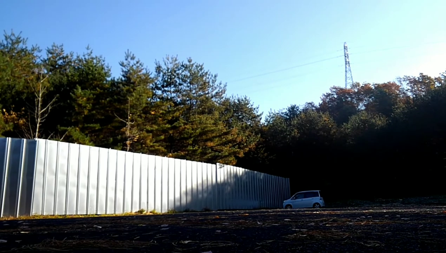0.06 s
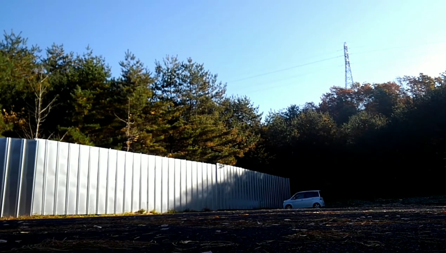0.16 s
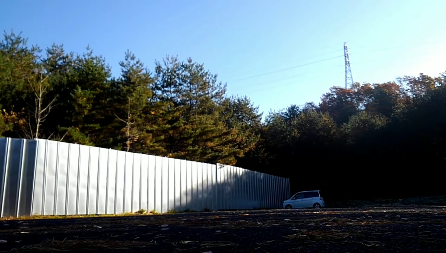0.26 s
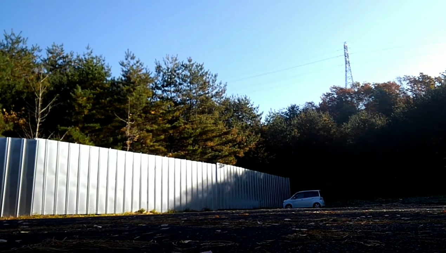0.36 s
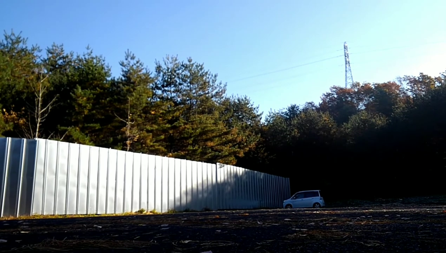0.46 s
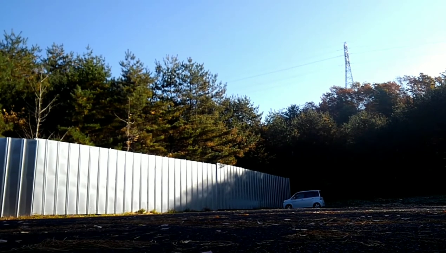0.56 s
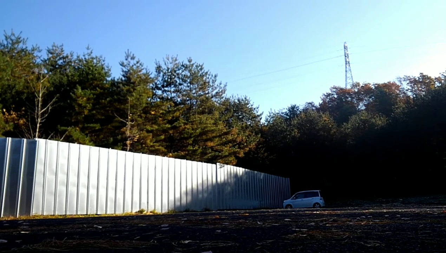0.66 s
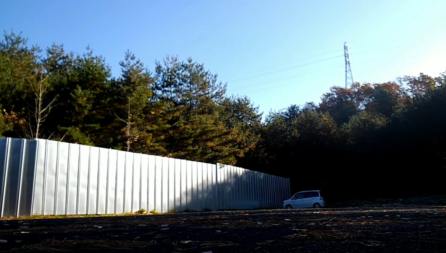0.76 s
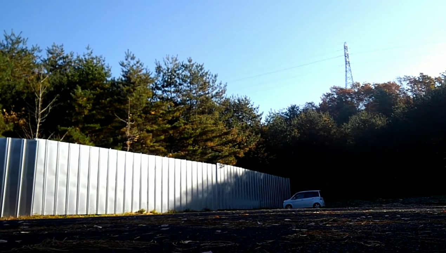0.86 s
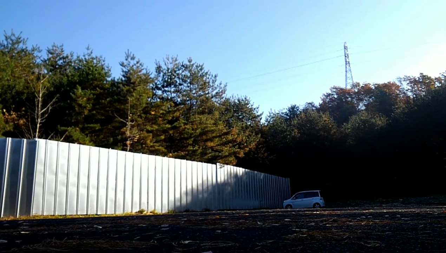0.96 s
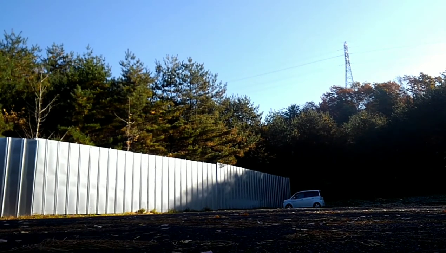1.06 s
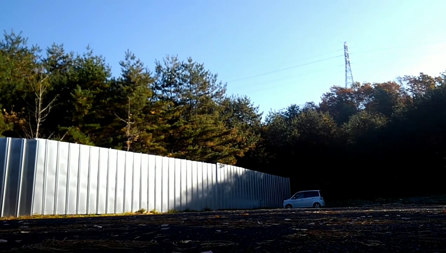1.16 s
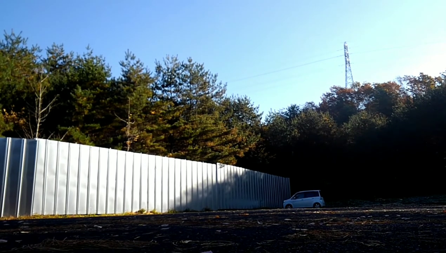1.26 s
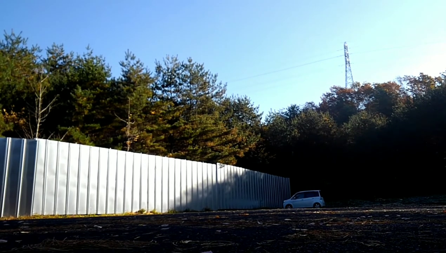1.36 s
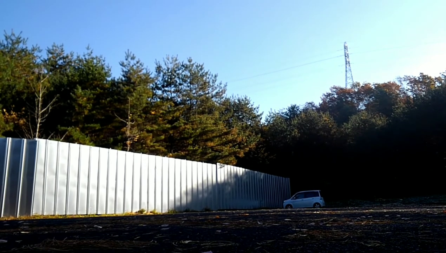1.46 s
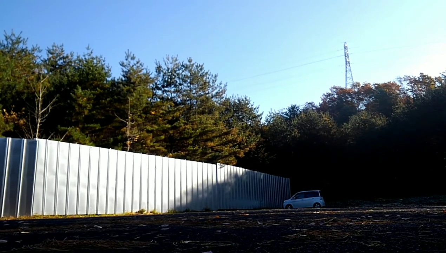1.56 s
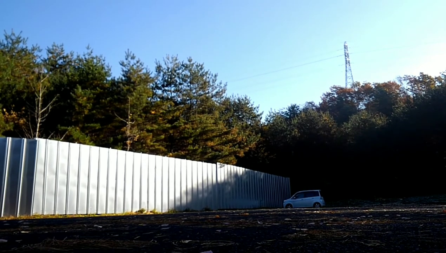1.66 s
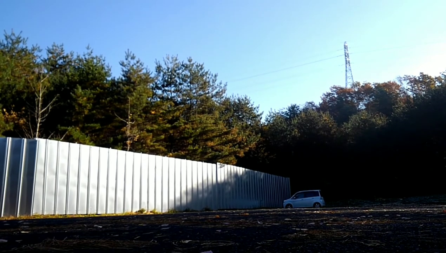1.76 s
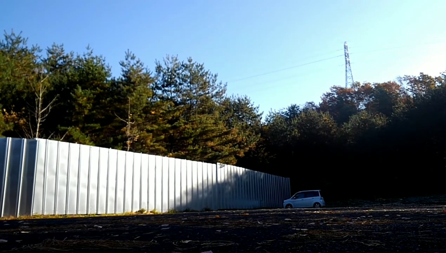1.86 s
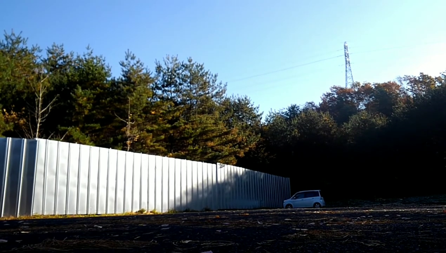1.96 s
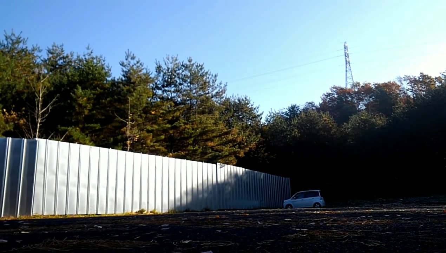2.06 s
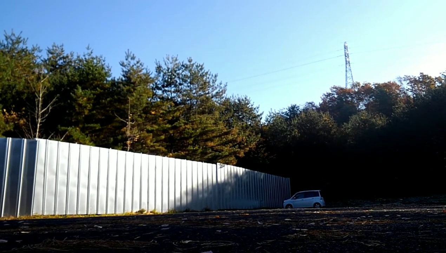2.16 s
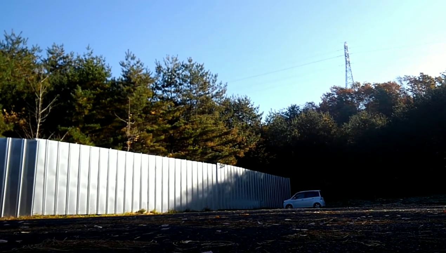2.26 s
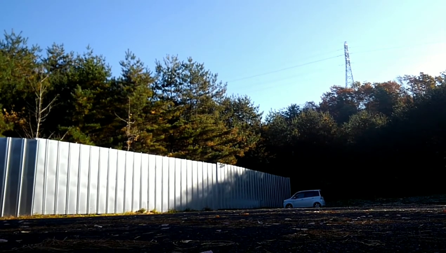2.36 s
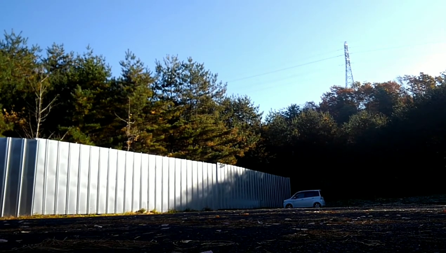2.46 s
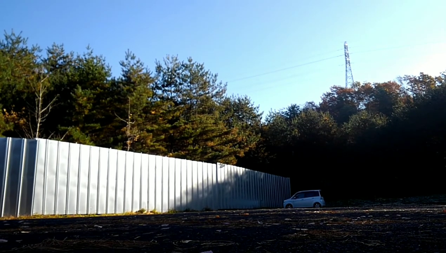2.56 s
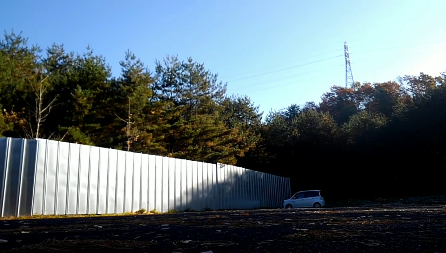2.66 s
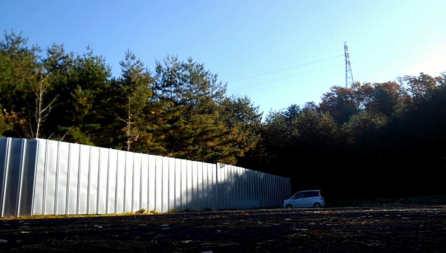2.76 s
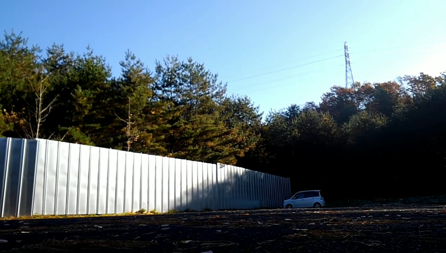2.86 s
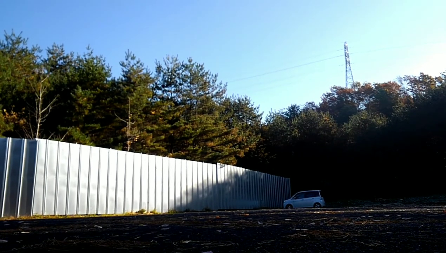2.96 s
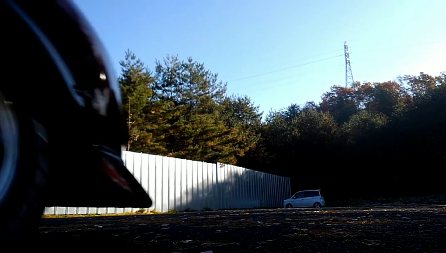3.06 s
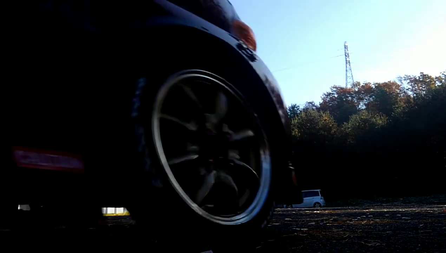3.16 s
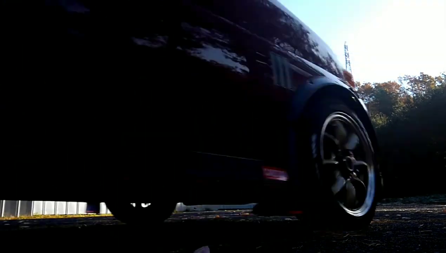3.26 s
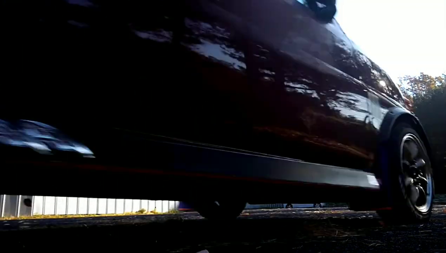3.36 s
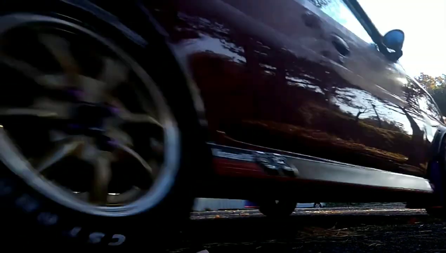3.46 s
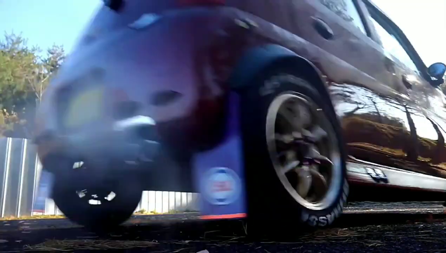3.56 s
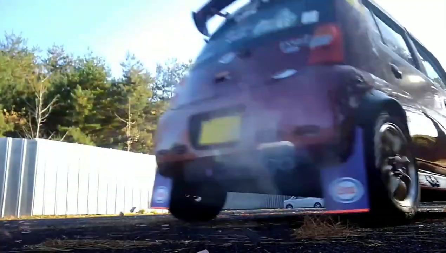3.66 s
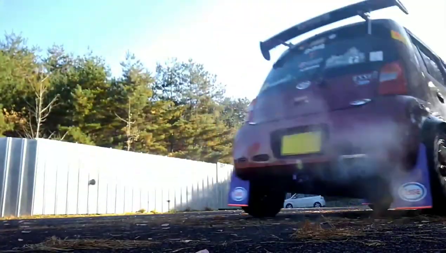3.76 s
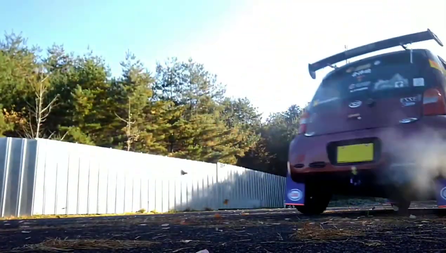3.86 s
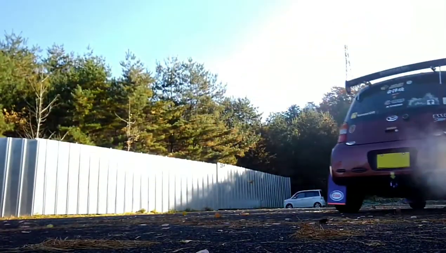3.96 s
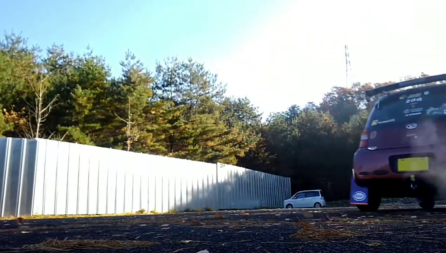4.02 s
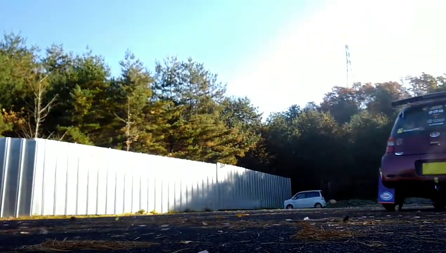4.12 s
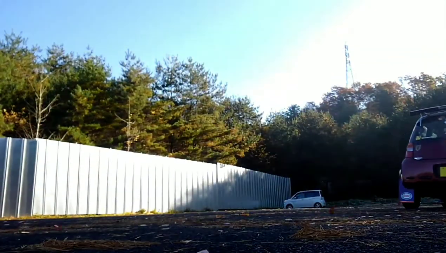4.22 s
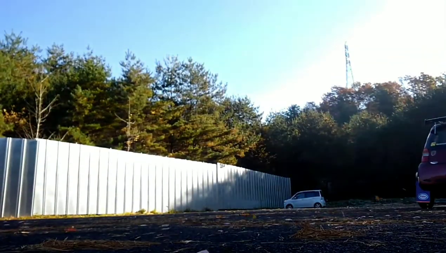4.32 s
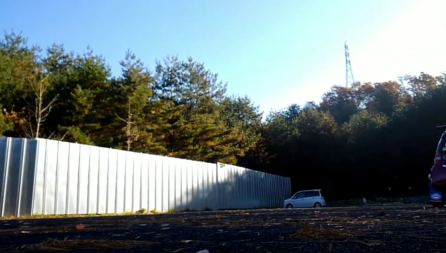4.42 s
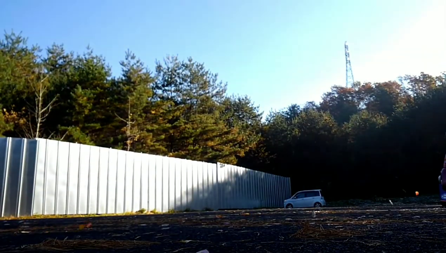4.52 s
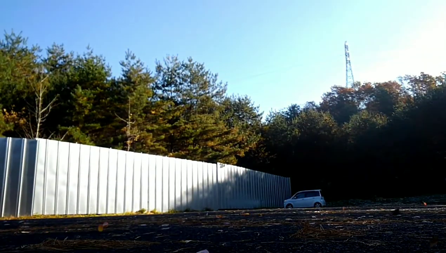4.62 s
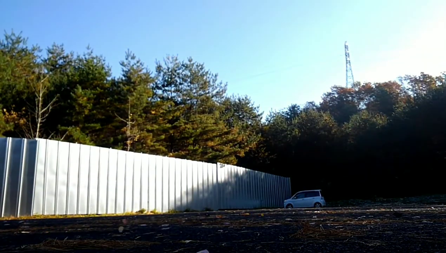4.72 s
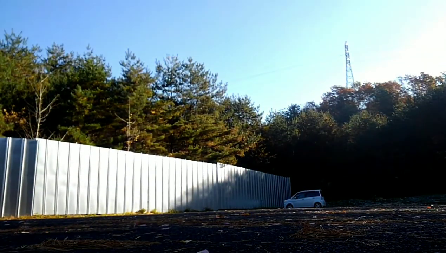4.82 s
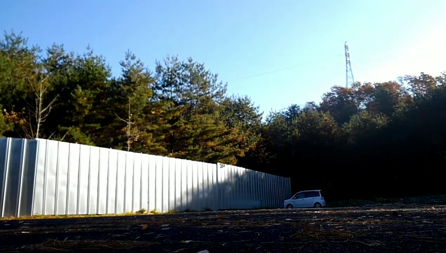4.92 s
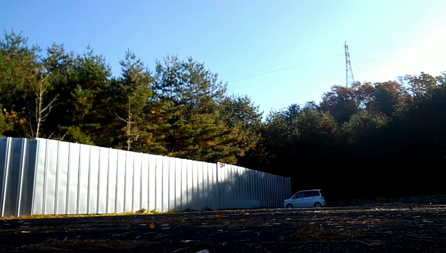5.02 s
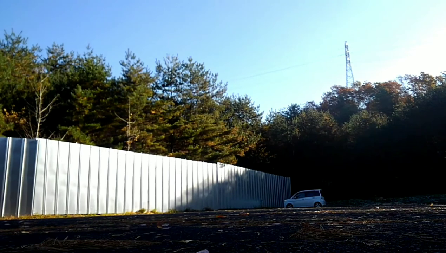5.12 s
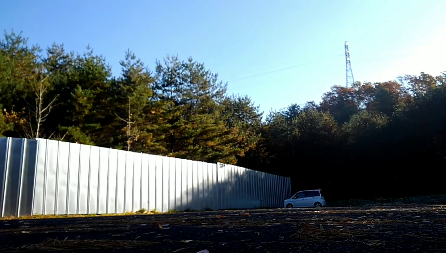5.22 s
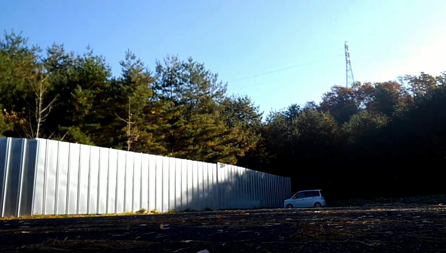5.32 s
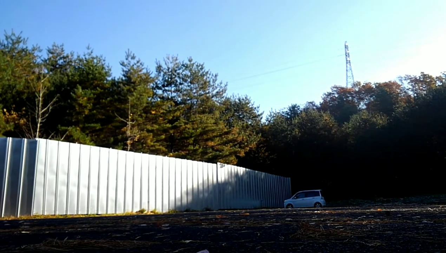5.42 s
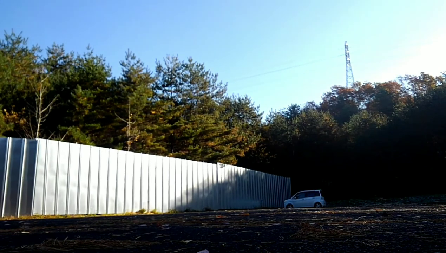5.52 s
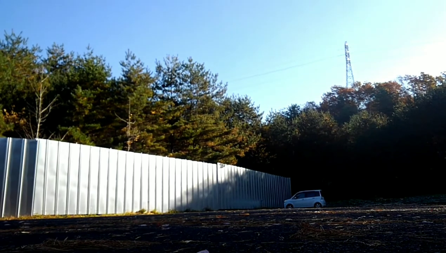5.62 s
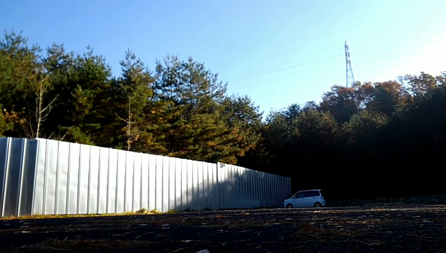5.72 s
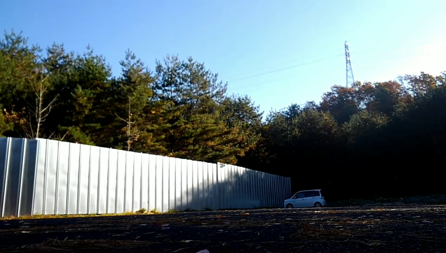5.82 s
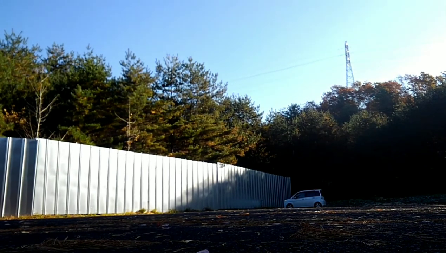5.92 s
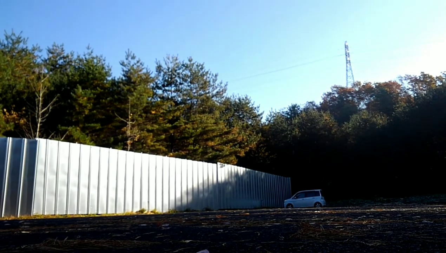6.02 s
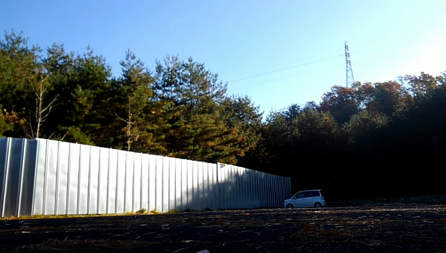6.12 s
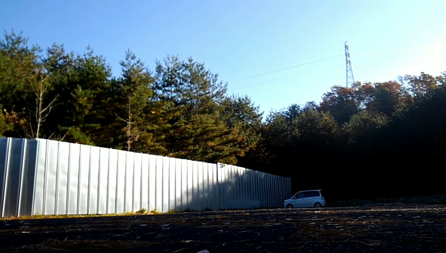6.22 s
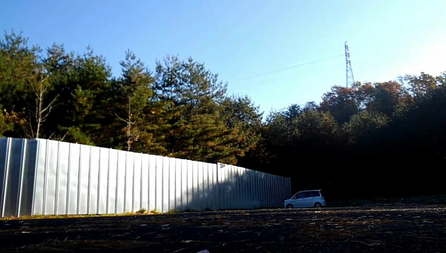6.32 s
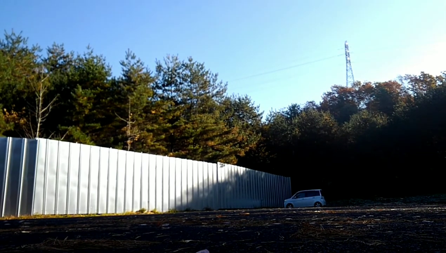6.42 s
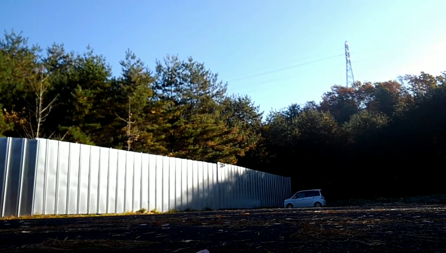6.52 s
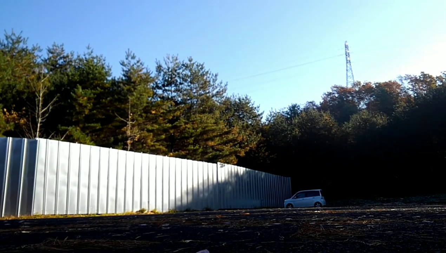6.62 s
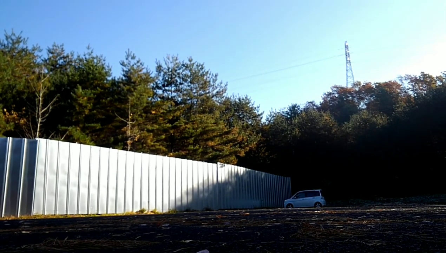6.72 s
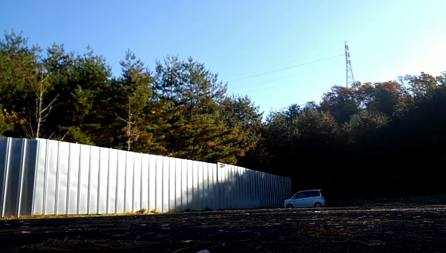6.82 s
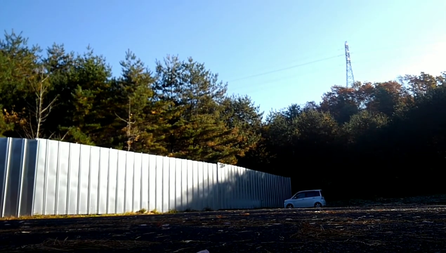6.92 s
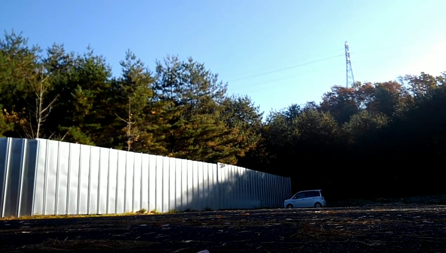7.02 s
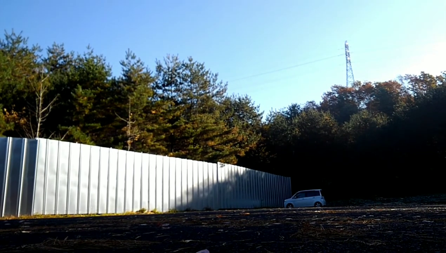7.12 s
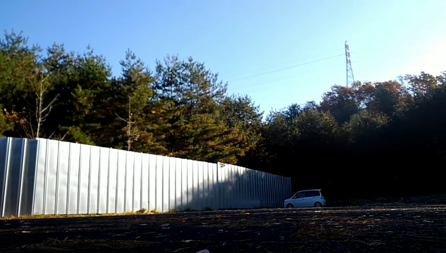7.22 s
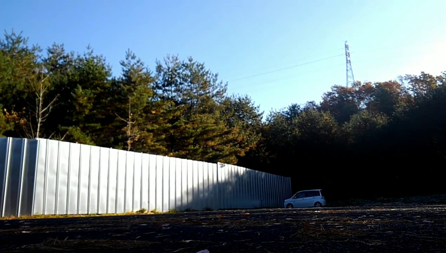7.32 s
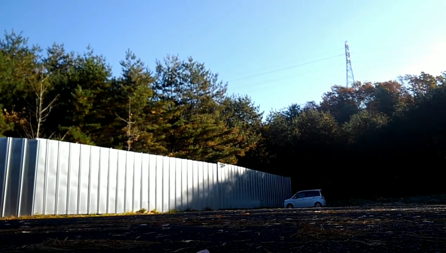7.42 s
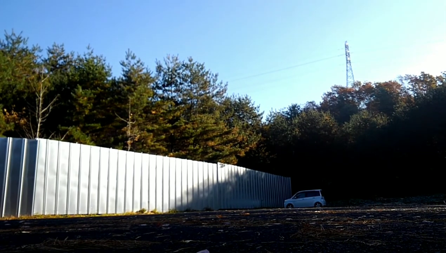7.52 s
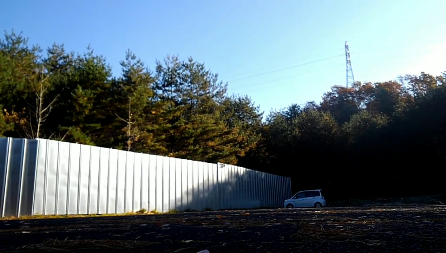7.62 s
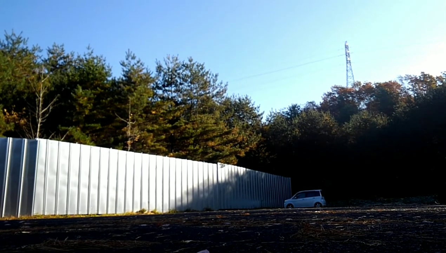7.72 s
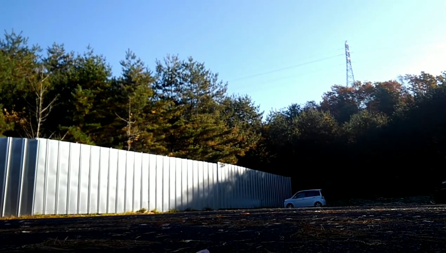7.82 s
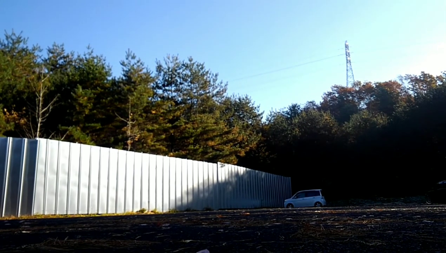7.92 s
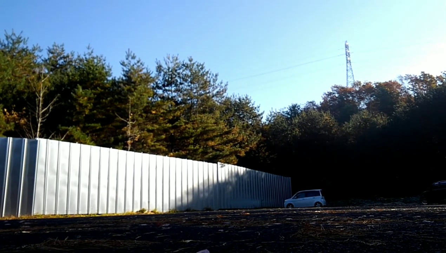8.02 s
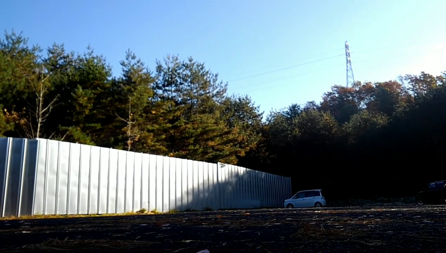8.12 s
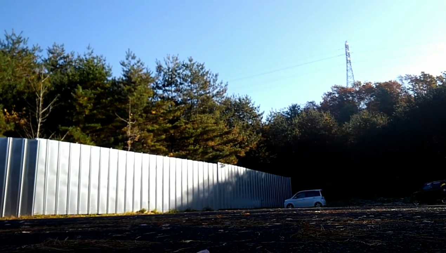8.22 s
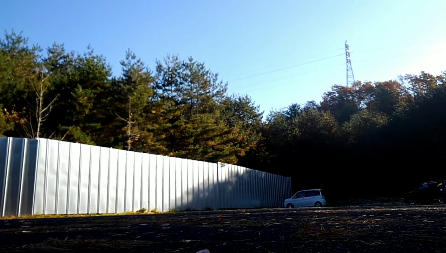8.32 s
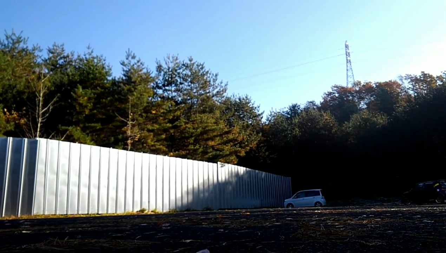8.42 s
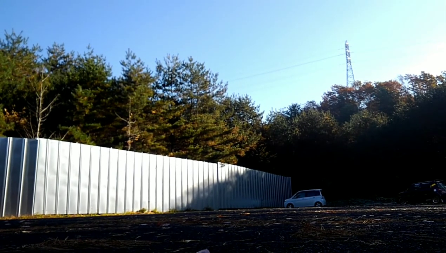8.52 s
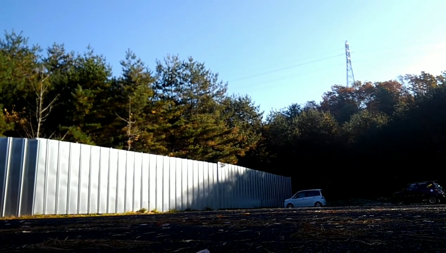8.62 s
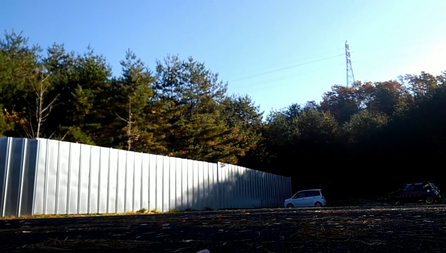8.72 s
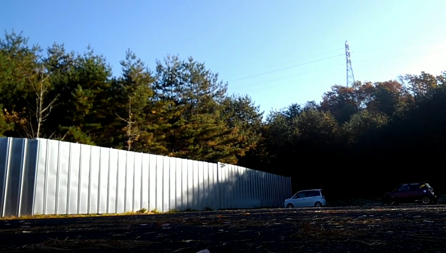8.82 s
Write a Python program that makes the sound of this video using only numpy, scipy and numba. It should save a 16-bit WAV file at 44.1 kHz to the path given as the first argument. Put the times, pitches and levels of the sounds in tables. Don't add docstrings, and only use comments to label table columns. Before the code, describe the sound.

Buzzy small car engine climbs in pitch, roars close by with overloaded exhaust and gravel crunch, then drops, pops and blips faintly far off.

```python
import sys
import numpy as np
from scipy import signal
from scipy.fft import rfft, irfft
from scipy.io import wavfile
from scipy.ndimage import uniform_filter1d
from numba import njit

SR = 44100
rng = np.random.default_rng(int(sys.argv[2]) if len(sys.argv) > 2 else 0)


def put_to_file(sound):
    columns = np.atleast_2d(sound).T
    safe = np.clip(columns, -1, 1)
    whole_steps = np.round(safe * 32767)
    wavfile.write(sys.argv[1], SR, whole_steps.astype(np.int16))


def gain_from_db(level_db):
    decades = np.asarray(level_db, float) / 20
    return 10 ** decades


N = 391595
TIME = np.arange(N) / SR
STEP = 128

# time in seconds, firing rate in Hz.
FIRING_RATE = [(0, 38.3), (.07, 39.25), (.32, 51.8), (.76, 60.5), (1.21, 63.4), (1.75, 68), (2.77, 92.4),
               (3.07, 100.4), (3.34, 108.3), (3.71, 115.4), (4.15, 127.8), (4.77, 131.5), (5.32, 122),
               (5.81, 106.2), (7.05, 59.1), (7.3, 55.5), (8.4, 48.7), (8.88, 51)]
# start, lowest point
# and end in seconds, sag in Hz.
RATE_SAGS = [(.32, .54, .76, 4.4), (.76, 1.04, 1.21, 4.3), (3.78, 3.93, 4.05, 1.3), (4.43, 4.53, 4.77, 6.3),
             (4.8, 5.09, 5.32, 8.6), (4.855, 4.865, 4.875, 14), (4.995, 5.005, 5.015, 14),
             (5.35, 5.6, 5.81, 3.8), (5.85, 6.33, 7.05, 3.2), (7.7, 8.04, 8.3, -1.5), (8.4, 8.58, 8.88, -1.1)]
# time in seconds, throttle as a share from 0 to 1.
THROTTLE = [(0, 0), (.9, 0.47), (2.0, 0.33), (3.0, 0.97), (4.36, 0.91), (4.43, .2), (4.62, 0.84),
            (4.9, 0.41), (5.32, 0.66), (5.8, .3), (6.8, 0), (8.88, 0.01)]
# time in seconds, distance from the microphone in metres.
DISTANCE = [(0, 15.7), (.9, 13.5), (1.6, 10.7), (2.1, 5.8), (2.8, 2.63), (3.3, 1.55), (3.8, 1.48),
            (4.4, 4.86), (5.8, 8), (7.2, 22), (8.88, 47)]
# time in seconds, place (0 ahead, 1 behind, 2 far).
AIM = [(3.0, 0), (3.6, 1), (6.2, 1), (7.1, 2)]
TURN_TIMES = [7.9, 8.04]
TAIL_PASS_TIMES = [3.41, 3.46]

CYLINDER_LEVELS = [0, -2.2, -1.4]
# time in seconds, random spread of the firings in dB.
UNEVEN_FIRING = [(0, 1.2), (.4, .6), (2.7, .6), (3.0, 1.6), (3.35, 1.4), (3.55, .5), (5.4, .7), (6.3, 1.4),
                 (6.8, 2.2), (7.1, 1), (8.88, .6)]
# time in seconds, half length in seconds.
MISFIRES = [
    (4.482, 0.0042),
    (7.873, 0.025),
]

# time in seconds, level in dB.
LOUDNESS = [(0, -39), (.32, -30.5), (1.75, -27), (2.55, -20), (2.85, -19.5), (2.97, -10), (3.4, -12.5),
            (3.47, -2), (4.03, -15), (4.4, -19), (4.5, -18.5), (4.795, -17.5), (4.81, -20), (5.86, -23.5),
            (7.05, -41.5), (7.95, -42), (8.43, -30), (8.88, -37.5)]
# frequency in Hz, level in dB.
DEEP_AHEAD = [(38, -15), (70, -23), (115, 3), (137, -12), (165, -4.5), (205, -7), (240, -2.8), (330, -1.7)]
DEEP_BEHIND = [(75, -9.5), (100, 0), (128, 0.5), (160, -4), (205, -11), (258, -4), (300, -11), (380, -15)]
DEEP_FAR = [(50, 0.5), (60, 3.5), (110, -20), (130, -6), (165, -2), (200, -2)]
DEEP_TURNED = [(50, -27), (100, -9.5), (150, -10)]
# frequency in Hz, level in dB.
PIPE_AHEAD = [(88, -31), (150, 12), (278, 7), (356, -3), (478, -4.5), (721, -5), (1010, -33), (1280, 3),
              (1930, -26), (5000, -44.5), (6500, -56), (11000, -120)]
PIPE_BEHIND = [(88, -26), (150, 0.5), (507, 1.5), (898, -6), (1240, -14), (1820, -7), (2040, -11.5),
               (2510, -14), (4130, -24), (5000, -31), (6500, -49), (11000, -120)]
PIPE_FAR = [(88, -35), (150, 8.5), (353, -5.5), (439, -3.5), (505, -19.5), (707, -7), (878, -26),
            (1240, -47), (2000, -35), (2600, -64), (4400, -120)]
# low centre in Hz, its lift in dB,
# high centre in Hz, its lift in dB.
THROAT = [(337, 3.5, 450, 2.5), (328.2, 0, 486, 4), (327, 11.5, 480, 5)]
# time in seconds, half length in seconds,
# change in dB, order (0 means all the upper ones).
MEETINGS = [(0.147, 0.27, 10.5, 2), (.3, 0.27, 7, 1), (.6, 0.31, -12, 4), (1.06, 0.082, -4.5, 0),
            (1.2, 0.24, -19, 1), (2.106, 0.2, -3.5, 0), (1.547, .25, 8, 4), (2.953, 0.04, -9, 2),
            (3.153, 0.091, -5, 3), (3.198, 0.35, 10, 2), (3.395, 0.016, -18, 2), (3.415, 0.04, -10, 1),
            (3.548, 0.21, 12.5, 11), (3.605, 0.6, -2, 9), (3.616, 0.28, 14.5, 3), (3.704, 0.33, 1.5, 1),
            (4.03, 0.085, -7.5, 2), (4.146, 0.45, -12, 4), (4.418, .04, -10, 1), (5.0, 0.43, -4, 1),
            (5.21, 0.39, -4.5, 4), (6.326, .12, 0, 0), (6.496, 0.041, 6, 1), (6.5, .07, 6, 2),
            (6.57, 0.1, 11.5, 0), (6.584, 0.048, 5.5, 4), (6.707, 0.17, 8, 1), (6.9, 0.08, 13, 0),
            (4.173, 0.14, 10.5, 3), (8.457, 0.15, 8, 7)]
# time in seconds, spread of the waves in radians.
SCATTER = [(2.6, 1.6), (3.6, .5), (6.6, .5), (7.6, 1.0)]
# centre in Hz, width in Hz, change in dB.
NOTCHES = [(1230, 160, -3.5), (2544, 76, -13), (3470, 76, -9), (4600, 120, -10), (5650, 130, -9),
           (6400, 150, -6), (7900, 230, -21)]
# time in seconds, share from 0 to 1.
DOWN_PIPE = [(3.7, 0), (4.2, 1)]
GROUND_DIP_DISTANCES = [13.3, 16]

# frequency in Hz, level in dB.
GAS_COLOUR = [(530, -19), (900, -1.5), (968, -9.5), (1230, -7), (1430, -7), (1740, -8.5), (3060, -11.5),
              (8000, -35), (10400, -72), (17600, -120)]
# frequency in Hz, level in dB.
BOOM_COLOUR = [(40, -44), (100, -2), (300, 10.5), (700, 11.5), (1300, -11), (2500, -32)]
# frequency in Hz, level in dB.
GRAVEL_COLOUR = [(2350, -47), (4000, -8.5), (6580, -9), (8610, -11), (9270, -11), (10500, -9.5),
                 (12600, -8), (14100, -17), (14900, -8), (15700, -28)]
# time in seconds, share of the wheelspin lift.
WHEELSPIN = [(3.3, 1), (3.4, 1.5), (3.5, 1), (3.9, 1), (4.3, 1.5), (4.36, 1.5), (4.42, 0)]
# time in seconds, peak in dB, ring in Hz.
STONES = [(0.1214, -55, 5200), (0.3604, -45, 4710), (0.4364, -46, 4710), (0.6604, -52, 4640),
          (0.7654, -46, 5030), (0.8884, -35, 4970), (2.9542, -20, 5022), (3.651, -8, 5610),
          (3.6965, -19, 4516), (4.6783, -43, 4950), (4.9294, -41, 4968), (7.8914, -56, 4998),
          (8.2894, -59, 4496)]
# time in seconds, pitch in Hz, level in dB.
WHINE = [(1.5, 1108, -56), (1.8, 1120, -54), (2.0, 1204, -44), (2.2, 1264, -46), (2.4, 1334, -43),
         (2.6, 1400, -37)]
# time in seconds, peak in dB.
POPS = [
    (6.766, -25),
    (6.836, -27.5),
    (6.885, -19),
    (6.919, -16),
]

# frequency in Hz, level in dB.
AIR_COLOUR = [(30, -4.5), (77, -4), (150, -7.5), (230, -12), (330, -5), (470, -6), (1270, -24.5),
              (2400, -27), (4000, -34), (6000, -38), (8000, -48.5), (15700, -60)]
# time in seconds, peak in dB.
GUSTS = [
    (0, -58),
    (3.24, -36.5),
    (6.25, -47),
]
# centre in Hz, width in Hz, lift in dB.
HOUSING = [(1100, 99, 5), (2390, 60, 5), (3360, 120, 3), (4240, 280, 2)]

DEEP_FLUTTER_DB = 1.5
RASP_HZ = 1120
PIPE_MODE_HZ, PIPE_MODE_DB, PIPE_MODES_END_HZ = 161.7, 4, 804
GROUND_DIP_HZ, GROUND_DIP_DB = 582, -6
GAS_1M_DB, GAS_THROTTLE_DB, GAS_BEHIND_DB, GAS_FALL = -27, 9.5, 6, 1.12
RASP_DB, RASP_THROTTLE_DB, RASP_BEHIND_DB = -10, 5, 6.6
GRAVEL_1M_DB, WHEELSPIN_DB, GRAVEL_FALL = -43.5, 8.5, 1.52
AIR_DB = -44.5
CALM_DB, GUST_RISE_DB_S, GUST_FALL_DB_S = -56, 35, 8
FENCE_S, FENCE_DB = .021, -18
TREES_T60_S, TREES_DB = .7, -19
CLIP_TOP, CLIP_BOTTOM, OFFSET = .75, .68, -.004


def curves(table):
    s, *columns = np.transpose(table)
    return [np.interp(TIME, s, column) for column in columns]


def shape(points, hz):
    f, db = np.transpose(points)
    return np.interp(np.log(hz), np.log(f), db)


def unit(x):
    return x / np.sqrt(np.mean(x ** 2))


def even(x, span_s=0.1):
    return x / np.sqrt(uniform_filter1d(x ** 2, int(span_s * SR)) + 1e-12)


def walk(rate):
    k = int(SR / rate)
    stairs = np.repeat(rng.standard_normal(N // k + 1), k)
    return 1.25 * uniform_filter1d(uniform_filter1d(stairs, k), k)[:N]


def clicks(times, sizes):
    out = np.zeros(N)
    places = np.minimum((np.asarray(times) * SR).astype(int), N - 1)
    np.add.at(out, places, sizes)
    return out


def colour(x, points):
    hz, db = np.transpose(points)
    grid = np.linspace(1, SR / 2, 2049)
    cep = irfft(np.interp(np.log(grid), np.log(hz), db) * np.log(10) / 20)
    cep[1:2048] *= 2
    cep[2049:] = 0
    return signal.fftconvolve(x, irfft(np.exp(rfft(cep))))[:N]


def bumps(x, table):
    hz = np.arange(20, 12000, 20.)
    db = sum(lift_db * np.exp(-((hz - centre_hz) / width) ** 2 / 2) for centre_hz, width, lift_db in table)
    return colour(x, np.transpose([hz, db]))


def revs():
    sag_hz = sum(np.interp(TIME, [start, low, end], [0, sag, 0]) for start, low, end, sag in RATE_SAGS)
    return curves(FIRING_RATE)[0] - sag_hz


def facing(k):
    aim = curves(AIM)[0] + np.interp(TIME, TURN_TIMES, [0, 1])
    return np.clip(1 - abs(aim - k), 0, 1)


def effort():
    load = np.clip(curves(THROTTLE)[0], 0, 1)
    loss_db = -20 * np.log10(curves(DISTANCE)[0])
    behind = facing(1)
    gas_db = GAS_1M_DB + GAS_FALL * loss_db + GAS_THROTTLE_DB * load + GAS_BEHIND_DB * behind
    rasp_db = RASP_DB + RASP_THROTTLE_DB * load + RASP_BEHIND_DB * behind * (1 + load)
    gravel_db = GRAVEL_1M_DB + GRAVEL_FALL * loss_db + WHEELSPIN_DB * curves(WHEELSPIN)[0]
    return gas_db, rasp_db, gravel_db


def meetings(k):
    return sum(db * np.exp(-((TIME - s) / half) ** 2)
               for s, half, db, order in MEETINGS if round(order) == k) + 0 * TIME


def levels(hz):
    passed = np.interp(TIME, TAIL_PASS_TIMES, [0, 1])
    far, turned = facing(2), facing(3)
    shares = [1 - passed, passed - far - turned, far, turned]
    sides = [DEEP_AHEAD, DEEP_BEHIND, DEEP_FAR, DEEP_TURNED]
    loudness_db = curves(LOUDNESS)[0]
    out = []
    for k in range(1, 4):
        deep_db = sum(share * shape(side, k * hz) for share, side in zip(shares, sides))
        out.append(loudness_db + deep_db + DEEP_FLUTTER_DB * walk(9) + meetings(k))
    return out + [loudness_db + meetings(0)]


def throat():
    aim = curves(AIM)[0]
    low_hz, low_db, high_hz, high_db = (np.interp(aim, range(3), c) for c in np.transpose(THROAT))
    return [low_hz * (1 + .015 * walk(4)), low_db, high_hz, high_db]


def orders(hz, level_db, rasp_db):
    low_hz, low_db, high_hz, high_db = (c[::STEP] for c in throat())
    share_db = effort()[1][::STEP]
    aim, scatter, distance = (curves(table)[0][::STEP] for table in (AIM, SCATTER, DISTANCE))
    f = np.arange(4, 42)[:, None] * hz[::STEP]
    sides = [PIPE_AHEAD, PIPE_BEHIND, PIPE_FAR]
    db = sum(np.clip(1 - abs(aim - k), 0, 1) * shape(side, f) for k, side in enumerate(sides))
    db = db + low_db * np.exp(-(np.log(f / low_hz) / 0.12) ** 2)
    db = db + high_db * np.exp(-(np.log(f / high_hz) / 0.092) ** 2)
    db = db + np.array([meetings(k)[::STEP] for k in range(4, 42)])
    standing = np.cos(2 * np.pi * f / PIPE_MODE_HZ) * np.exp(-(f / PIPE_MODES_END_HZ) ** 4)
    db = db + PIPE_MODE_DB * standing
    dip_db = np.interp(distance, GROUND_DIP_DISTANCES, [0, GROUND_DIP_DB])
    db = db + dip_db * np.exp(-(np.log(f / GROUND_DIP_HZ) / .09) ** 2)
    drift = uniform_filter1d(rng.standard_normal(f.shape), size=140, axis=1) * np.sqrt(140)
    gain = gain_from_db(db + 1.7 * drift)
    rasp = f > RASP_HZ
    body = gain * ~rasp / np.sqrt(np.sum(gain ** 2 * ~rasp * (f > 290), axis=0) / 2)
    edge = gain * rasp / np.sqrt(np.sum(gain ** 2 * rasp, axis=0) / 2 + 1e-9)
    lag = .5 + scatter * rng.standard_normal((len(f), 1))
    return (body * gain_from_db(level_db[::STEP]) + edge * gain_from_db(rasp_db[::STEP] + share_db)) * np.exp(-1j * lag)


@njit
def stack(turns, gains, first):
    out = np.zeros(len(turns))
    for i in range(len(turns)):
        j, part = min(i // 128, gains.shape[1] - 2), (i % 128) / 128
        step = np.exp(2j * np.pi * turns[i])
        spin = np.exp(2j * np.pi * turns[i] * first)
        for k in range(gains.shape[0]):
            gain = (1 - part) * gains[k, j] + part * gains[k, j + 1]
            out[i] += (gain * spin).real
            spin *= step
    return out


def firing_sizes(turns):
    firing = (turns + .3).astype(int)
    chance = rng.standard_normal(N // 100)[firing]
    size = gain_from_db(np.array(CYLINDER_LEVELS)[firing % 3] + curves(UNEVEN_FIRING)[0] * chance)
    for s, half_s in MISFIRES:
        size = size * (1 - 0.98 * (abs(TIME - s) < half_s))
    return uniform_filter1d(size, size=60)


def engine():
    hz = revs()
    first_db, second_db, third_db, upper_db = levels(hz)
    gas_db, rasp_db, _ = effort()
    gas_db = gas_db - .75 * np.maximum(rasp_db + 5, 0)
    turns = np.cumsum(hz * (1 + .0008 * walk(40))) / SR
    size = firing_sizes(turns)

    deep = sum(np.sqrt(2) * gain_from_db(db) * np.cos(2 * np.pi * k * turns - lag)
               for k, db, lag in [(1, first_db, 1.0), (2, second_db, 0.78), (3, third_db, 0.62)])
    upper = stack(turns, orders(hz, upper_db - 2.5, gas_db), 4.)
    puff = .9 + size * np.exp(-(turns % 1) / .4)
    gas = even(colour(puff * rng.standard_normal(N), GAS_COLOUR)) * gain_from_db(gas_db + 2.42 + 0.46 * walk(15))
    boom_db = upper_db - 16 - 7 * (facing(2) + facing(3))
    boom = unit(colour(rng.standard_normal(N), BOOM_COLOUR)) * gain_from_db(boom_db)

    rest = upper * size + gas + boom
    share = curves(DOWN_PIPE)[0]
    return deep * size ** 0.67, (1 - share) * rest + share * bumps(rest, NOTCHES)


def gusts():
    each = [db - np.maximum((s - TIME) * GUST_RISE_DB_S, (TIME - s) * GUST_FALL_DB_S) for s, db in GUSTS]
    return np.max(each + [CALM_DB + 0 * TIME], axis=0)


def outdoors():
    air = unit(colour(rng.standard_normal(N), AIR_COLOUR)) * gain_from_db(AIR_DB)
    wind = colour(rng.standard_normal(N), [(12, 4), (25, 0), (45, 17), (90, -15), (200, -80)])
    return air + unit(wind) * gain_from_db(gusts() - 1.0)


def echoes(x):
    t = TIME[:SR]
    tail = rng.standard_normal(SR) * np.exp(-np.log(1000) * t / TREES_T60_S) * (t > .04)
    tail = signal.lfilter([1], [1, -.8], tail)
    tail = tail / np.sqrt(np.sum(tail ** 2)) * gain_from_db(TREES_DB)
    tail[int(FENCE_S * SR)] += gain_from_db(FENCE_DB)
    return signal.fftconvolve(x, tail)[:N]


def gravel():
    when, strength, side = rng.random((24000, 3)).T
    sizes = gain_from_db(-2.6 * np.log(strength + .001)) * np.sign(side - .5)
    grains = clicks(when * N / SR, sizes)
    crunch = unit(colour(unit(grains) + 1.1 * rng.standard_normal(N), GRAVEL_COLOUR))
    bed = crunch * gain_from_db(effort()[2] + 0.24 * walk(6.6))
    t = TIME[:900]
    for s, db, hz in STONES:
        scrape = np.convolve(rng.standard_normal(len(t)), [.6, .4, -.6, -.4], "same")
        ring = np.sin(2 * np.pi * hz * t)
        tick = t / .001 * np.exp(-t / .001) * (.4 * ring + .5 * scrape)
        bed[int(s * SR):][:len(t)] += gain_from_db(db - 4.5) * tick
    return bed


def whine():
    hz, db = curves(WHINE)
    fade = np.interp(TIME, [1.3, 1.6, 2.5, 2.7], [0, 1, 1, 0])
    return np.sqrt(2) * gain_from_db(db) * fade * np.sin(2 * np.pi * np.cumsum(hz) / SR)


def pops():
    s, db = np.transpose(POPS)
    t = TIME[:2000]
    blow = np.exp(-t / .0005) * np.sin(2 * np.pi * 420 * t)
    burst = 0.14 * np.exp(-t / .012) * rng.standard_normal(len(t))
    ring = colour(np.pad(blow + burst, (0, N - len(t))), PIPE_BEHIND)[:4000]
    return signal.fftconvolve(clicks(s, gain_from_db(db)), ring / abs(ring).max())[:N]


def scene():
    deep, rest = engine()
    rest = rest + gravel() + whine() + pops()
    return (deep + rest + echoes(rest) + outdoors())[None]


def band_limit(x):
    return signal.sosfilt(signal.butter(12, 15850, fs=SR, output="sos"), x)


def record(dry):
    heard = bumps(dry[0], HOUSING)[None]
    top = np.where(heard > 0, CLIP_TOP, CLIP_BOTTOM)
    clipped = heard / (1 + abs(heard / top) ** 8.) ** (1 / 8.)
    return band_limit(clipped + OFFSET)


dry = scene()
out = record(dry)
put_to_file(out)
```